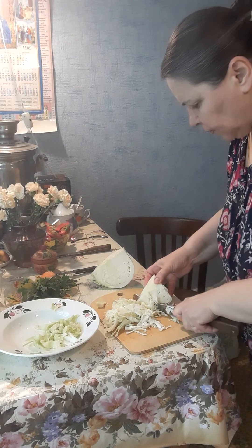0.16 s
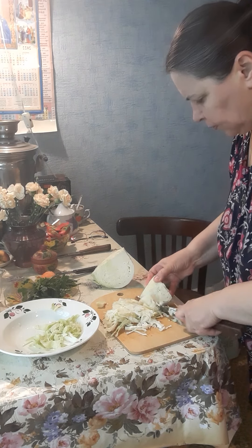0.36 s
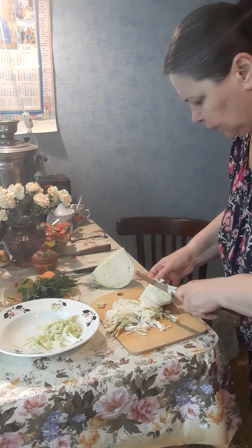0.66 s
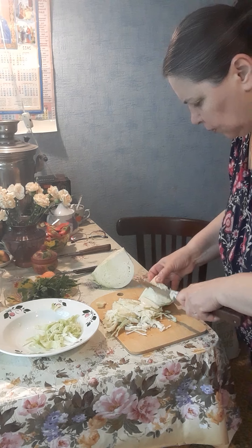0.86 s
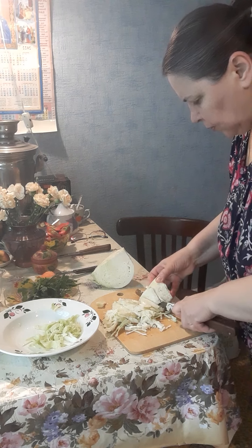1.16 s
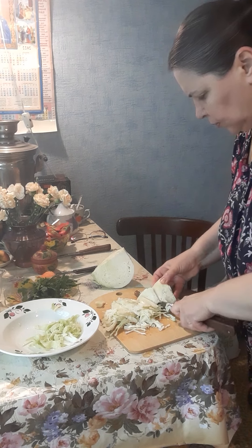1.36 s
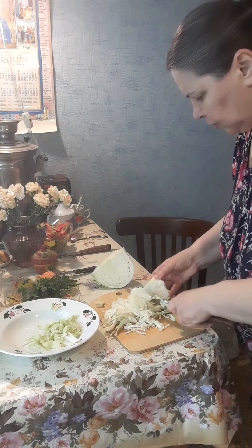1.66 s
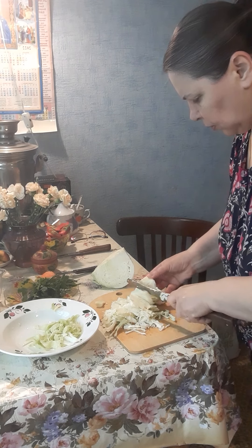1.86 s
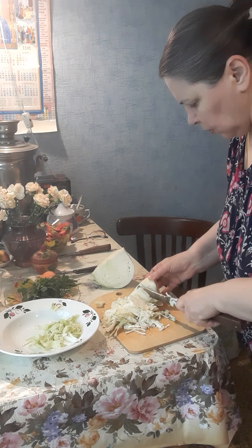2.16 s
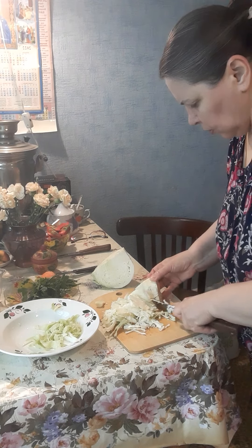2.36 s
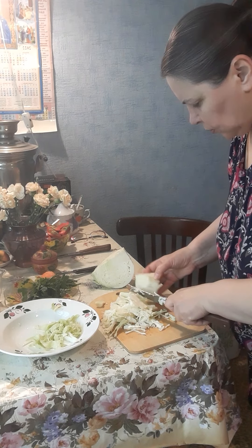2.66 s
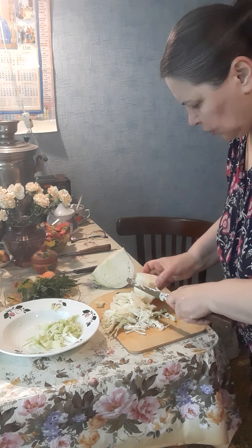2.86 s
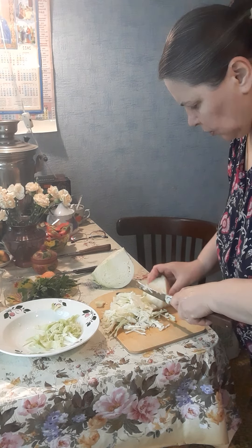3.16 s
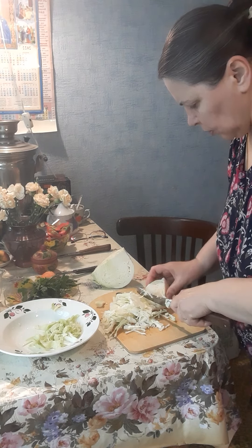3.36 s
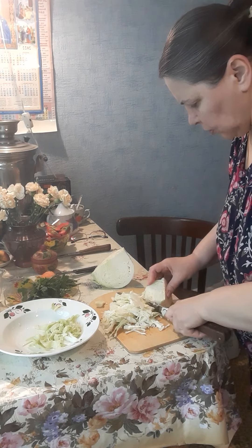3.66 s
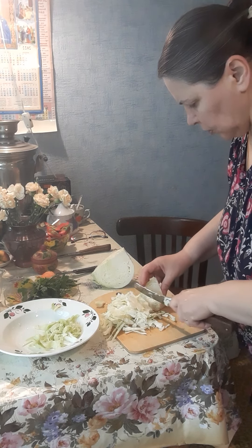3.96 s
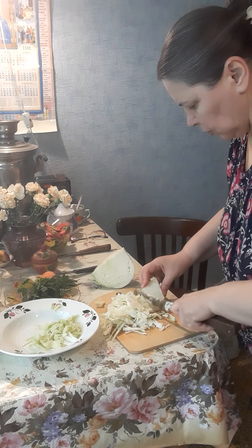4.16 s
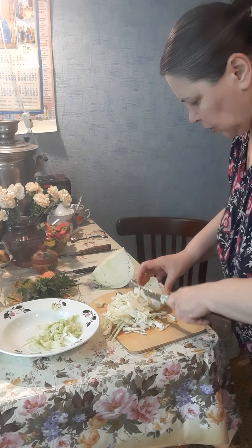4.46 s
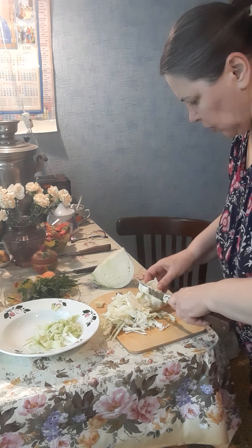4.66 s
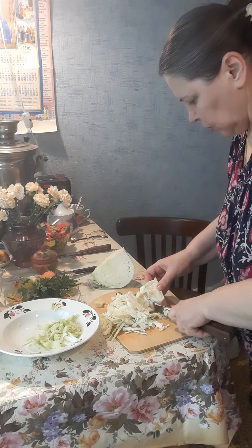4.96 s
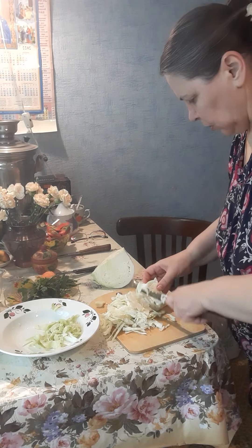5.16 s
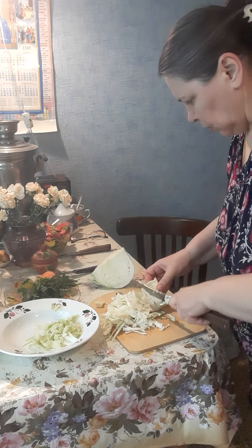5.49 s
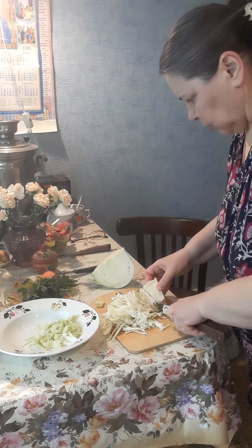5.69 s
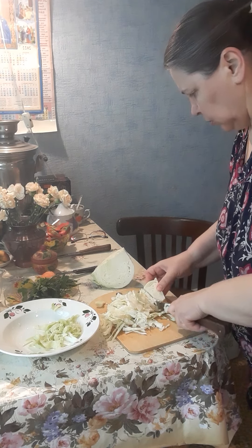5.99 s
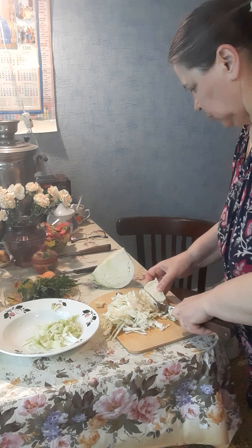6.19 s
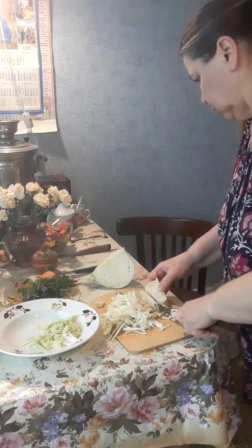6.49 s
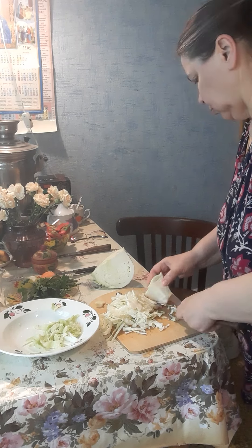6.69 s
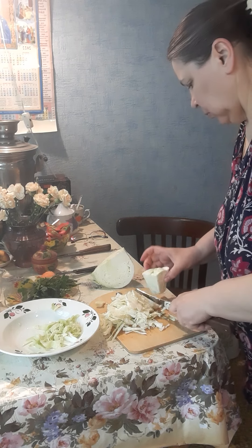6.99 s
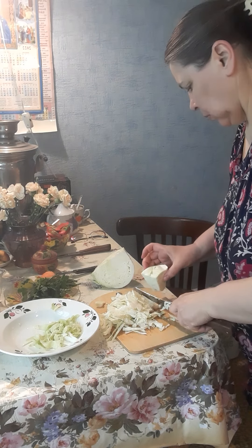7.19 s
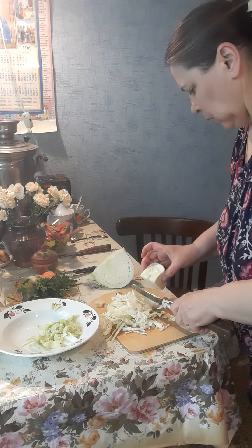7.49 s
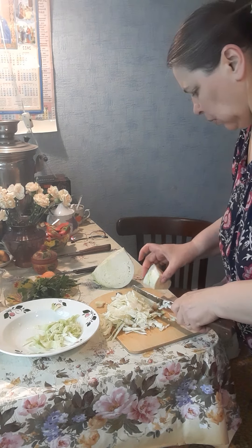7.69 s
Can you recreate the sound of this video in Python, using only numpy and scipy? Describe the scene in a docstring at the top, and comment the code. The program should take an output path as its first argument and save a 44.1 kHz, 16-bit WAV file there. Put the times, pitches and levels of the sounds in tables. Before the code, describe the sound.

Crisp, fibrous cabbage slicing on a wooden board, irregular knocks and table thuds, light leafy rustles between strokes, in a small humming kitchen.

```python
"""A kitchen knife shears through cabbage over a steady house rumble and hiss, in a small room.
Each cut snaps leaf fibres and shakes a wooden board on a cloth-covered table; blade or stalk landing
rings the board, thuds the table and cracks at the edge. Shreds crackle between the strokes.
From the third cut fingers rustle the leaves too; after the last cut shreds and fingers are left.
Of two microphone ports the left one is open; the right one is covered, dull and boomy."""
import sys
import numpy as np
from scipy import signal
from scipy.fft import rfft, irfft, next_fast_len
from scipy.io import wavfile
from scipy.ndimage import uniform_filter1d

SR = 44100
rng = np.random.default_rng(int(sys.argv[2]) if len(sys.argv) > 2 else 0)


def file_out(sig):
    """Save sig as 16-bit WAV at sys.argv[1]."""
    # one column per channel
    cols = np.atleast_2d(sig).T
    # limit, then scale
    lim = np.clip(cols, -1, 1)
    pcm = np.round(lim * 32767).astype(np.int16)
    wavfile.write(sys.argv[1], SR, pcm)


N = 345744

# Blade shearing through the head, one list a cut.
# Each row: time in seconds, snapping fibres in dB, table shaken by the arm in dB.
CUT_CURVES = [
    [(0.0, -49.5, -33.5), (0.114, -48, -38), (0.148, -36, -57)],
    [(0.835, -73.5, -61.5), (0.92, -57.5, -54), (0.989, -49, -45), (1.045, -48, -55), (1.113, -41.5, -37),
     (1.147, -45, -51.5), (1.209, -54, -55)],
    [(2.095, -81.5, -70.5), (2.14, -78, -66), (2.16, -64.5, -63), (2.194, -61, -62), (2.234, -64.5, -53),
     (2.35, -51.5, -50), (2.4, -47.5, -55), (2.45, -57.5, -65), (2.58, -63.5, -70), (2.65, -87.5, -81)],
    [(3.5, -74, -46), (3.568, -57.5, -73.5), (3.625, -44.5, -36)],
    [(4.086, -69.5, -54), (4.134, -63, -49.5), (4.176, -52, -50.5), (4.232, -45.5, -68)],
    [(4.745, -60, -54), (4.798, -51.5, -28), (4.83, -53.5, -74), (4.904, -44, -68), (4.932, -44.5, -31)],
    [(5.478, -62, -54), (5.53, -54.5, -48), (5.579, -47.5, -40.5), (5.635, -45.5, -49), (5.731, -66, -68)],
]
# Leaf met by each cut. Each row: brightness at MID_DB in dB per octave, board shaken over the snapping in dB.
CUT_LEAF = [(5.5, 5.5), (6, 5), (6, 5), (5, 7.5), (7, 6.5), (7, 9.5), (6, 8.5)]
# Settling shreds and loose leaves. Each row: start, peak and end in seconds, peak in dB, climb in dB,
# sag to the end in dB, brightness in dB per octave, peak of the board shaking in dB.
SHRED_CRACKLES = [(0.193, 0.25, .35, -67.5, 1, 8.5, 5.5, -49), (.362, 0.372, .4, -55, 9, 10, 9.5, -58.5),
                  (0.478, 0.493, 0.56, -58.5, 6, 17, 4.5, -68), (0.719, 0.732, .79, -80, 1, 14, 10, -64),
                  (1.25, 1.305, 1.46, -56, -8, 15.5, 4, -47.5),
                  (1.47, 1.526, 1.62, -66.5, 10, 14, 6.5, -62.5),
                  (1.634, 1.649, 1.68, -74.5, 5.5, 6, 9.5, -68), (2.78, 2.83, 2.88, -79, 7.5, 7, 11.5, -75),
                  (3.2, 3.222, 3.3, -72.5, 14, 2, 9.5, -52), (3.377, 3.463, 3.5, -82, 6.5, -5.5, 8.5, -72),
                  (3.654, 3.707, 3.83, -69.5, 2, 9.5, 8, -62), (4.26, 4.343, 4.46, -71, -4, 5, 7.5, -47),
                  (4.63, 4.66, 4.74, -82, 7, 3, 1.5, -68), (4.96, 5.016, 5.12, -67.5, 15, 22, 9.5, -47.5),
                  (5.35, 5.37, 5.42, -85, 7, 10, 3, -67), (5.426, 5.45, 5.48, -81.5, 7, -1, 6, -59.5),
                  (5.758, 5.87, 5.92, -78.5, 6.5, 9, 9.5, -69.5),
                  (5.974, 6.026, 6.11, -63, 14, 9, 10, -63.5), (6.19, 6.23, 6.255, -83, 3, 1, 10.5, -70),
                  (6.253, 6.301, 6.35, -60.5, 12, 12.5, 10, -63),
                  (6.512, 6.563, 6.62, -54, 10, 11, 9.5, -56.5),
                  (6.618, 6.676, 6.735, -68.5, 4.5, 9, 8, -69.5)]
# Damped wood on cloth. Each row: mode in Hz, level in dB, t60 in seconds (ring() caps it at 32 periods).
BOARD_MODES = [(208, -9, 0.16), (227, -5.5, 0.1), (287, -8, 0.033), (343.2, 4, 0.081), (381, 4.5, 0.056),
               (383.3, -2.5, 0.12), (426.9, 3.5, .04), (555.4, 1, 0.03), (626, -2, 0.023),
               (720, -0.5, 0.11), (753.4, 3, 0.038), (833, 0.5, 0.03), (930, 0, 0.015), (1100, -4, 0.015),
               (1138, -8.5, 0.18), (1380, -4.5, .02), (1486, -1.5, 0.12), (1780, -5, .02), (2060, -9, 0.12),
               (2300, -17.5, .015), (2916, -18, 0.016)]
# Table under the cloth. Each row: mode in Hz, level in dB, t60 in seconds (same cap).
TABLE_MODES = [(62, -6, .12), (78.5, 1.5, 0.1), (114.4, 0.9, 0.66)]
BOARD_BAND_HZ, TABLE_BAND_HZ = (258, 6000), (70, 150)  # what each plate radiates well
MID_DB = -46.5  # middle snapping level


def gain_of(db):
    """Decibels to an amplitude factor."""
    return 10 ** (np.asarray(db) / 20)


def evened(x):
    """Scales to rms 1."""
    return x / np.sqrt(np.mean(x ** 2) + 1e-20)


def read(points, hz):
    """Interpolates a (Hz, value) table on a log frequency axis."""
    point_hz, value = np.transpose(points)
    return np.interp(np.log(hz + 1), np.log(point_hz + 1), value)


def sides(tilt_db):
    """Left and right gains for a level difference; the mean of unrelated sides keeps power 1."""
    ratio = gain_of(-tilt_db)
    left = 2 / np.sqrt(1 + ratio ** 2)
    return left, ratio * left


def smooth_patches(x, widths):
    """Noise smoothed along both axes into patches of rms 1."""
    return evened(uniform_filter1d(uniform_filter1d(x, widths[0], axis=0), widths[1], axis=1))


def hum():
    """House rumble and hiss: random short-time spectra with a few room resonances and drifting patches."""
    # Each row: frequency in Hz, relative level in dB per Hz.
    hum_colour = [(18, -64.5), (30, -31.5), (86, -13), (112, -8), (165, -24.5), (189, -5), (266, -12),
                  (355, 6), (449, -18), (499, -17), (600, -29), (684, -24.5), (1540, -28.5), (2060, -41),
                  (16000, -42.5)]
    # Each row: centre in Hz, width in Hz, boost in dB.
    hum_peaks = [(123, 62, 6.5), (194, 130, 10), (352, 70, 2.5), (1530, 100, 11)]
    # Each row: frequency in Hz, left minus right in dB.
    hum_tilt = [(60, -5.5), (120, -16.5), (240, -18), (480, -24), (950, 0.5), (1890, 1), (3770, -3.5),
                (7520, -0.5), (15000, 3)]
    # Each row: frequency in Hz, likeness of the ports.
    hum_alike = [(60, 0.25), (180, 0.63), (550, 0.59), (1650, 0.57), (4970, 0.08), (15000, 0.03)]
    level_db = -59  # of the mean of both ports
    frames, hz = N // 512 + 5, np.fft.rfftfreq(2048, 1 / SR)
    a, b, c, d, raw_patches = rng.standard_normal((frames, 1025, 5)).T
    patches = smooth_patches(raw_patches, widths=(8, 8))
    colour_db = read(hum_colour, hz)
    for centre_hz, width_hz, db in hum_peaks:
        colour_db = colour_db + db * np.exp(-2 * ((hz - centre_hz) / width_hz) ** 2)
    alike = np.clip(read(hum_alike, hz), -1, 1)[:, None]
    first, other = a + 1j * b, c + 1j * d
    z = np.array([first, alike * first + np.sqrt(1 - alike ** 2) * other])
    z *= np.array(sides(read(hum_tilt, hz)))[:, :, None]
    z *= gain_of(colour_db[:, None] + 1.6 * patches)
    out = signal.istft(z, nperseg=2048, noverlap=1536)[1][:, :N]
    return gain_of(level_db) * out / np.std(out.mean(0))


def cut(rows, column):
    """One column of a cut in dB at every sample; it drops fast when the blade lets go."""
    lift_db_per_s = 1502
    rows, t = np.array(rows), np.arange(N) / SR
    db = np.interp(t, rows[:, 0], rows[:, column], left=-200)
    return db - lift_db_per_s * np.maximum(t - rows[-1, 0], 0)


def swell(start, peak, end, db, climb_db, sag_db):
    """Level in dB at every sample: a sudden start, a climb to the peak, a sag, a quick stop."""
    stop_db_per_s = 504
    t = np.arange(N) / SR
    level_db = np.interp(t, np.sort([start, peak, end]), [db - climb_db, db, db - sag_db], left=-200)
    return level_db - stop_db_per_s * np.maximum(t - end, 0)


def grains(per_s, spread_db):
    """Random clicks of either sign, a few of them large, at rms 1."""
    size = gain_of(spread_db * np.minimum(rng.exponential(1, N), 4))
    return evened(size * rng.standard_normal(N) * (rng.random(N) < per_s / SR))


def leaves():
    """Dense fibre snaps in clumps, coloured by the leaf and tilted by brightness; shreds settle between cuts."""
    # Tearing leaf. Each row: frequency in Hz, relative level in dB per Hz.
    snap_colour = [(290, -44.5), (500, -14), (562, -7.5), (613, -2.5), (807, 1.5), (974, -4.5), (1380, 5.5),
                   (1530, 6.5), (2460, -2), (7860, -21.5), (9770, -30.5), (13800, -28), (16000, -36)]
    bright_per_db = -0.12  # dB per octave for each dB: light pressure sounds thin, full pressure dull
    cuts_db = [cut(rows, column=1) for rows in CUT_CURVES]
    crackles_db = [swell(*row[:6]) for row in SHRED_CRACKLES]
    power = gain_of(cuts_db + crackles_db) ** 2 + 1e-30
    brights = [leaf[0] + bright_per_db * (db - MID_DB) for db, leaf in zip(cuts_db, CUT_LEAF)]
    brights += [row[6] + np.zeros(N) for row in SHRED_CRACKLES]
    bright = (power * np.clip(brights, -9, 12)).sum(0) / power.sum(0)  # the loudest part decides

    clumps = gain_of(2.0 * evened(uniform_filter1d(rng.standard_normal(N), size=300)))
    snaps = evened(clumps * grains(per_s=12000.0, spread_db=1.0))
    hz, t, z = signal.stft(snaps, SR, nperseg=256, noverlap=192)
    colour = gain_of(read(snap_colour, hz))
    colour = colour / np.sqrt(np.mean(colour[hz > 2500] ** 2))
    slope = np.interp(t, np.arange(N) / SR, bright)
    octaves = np.log2((hz[:, None] + 200) / 5000)
    patches = smooth_patches(rng.standard_normal(z.T.shape), widths=(24, 5)).T
    z = z * gain_of(1.9 * patches) * colour[:, None] * gain_of(octaves * slope)
    level = uniform_filter1d(np.sqrt(power.sum(0)), size=100)
    return level * signal.istft(z, SR, nperseg=256, noverlap=192)[1][:N]


def ring(modes, band_hz, place_db=0., size=16384):
    """Answer of a plate to a click, energy 1: decaying modes, their levels shifted by the place of the blow."""
    t = np.arange(size) / SR
    hz, db, t60 = np.transpose(modes)[:, :, None]
    db = db + place_db * rng.standard_normal(db.shape)
    decay = gain_of(db - 60 * t / np.minimum(t60, 32 / hz))
    out = (decay * np.sin(2 * np.pi * hz * t)).sum(0)
    out = signal.sosfilt(signal.butter(4, band_hz, "band", fs=SR, output="sos"), out)
    return out / np.linalg.norm(out)


def push():
    """The jerky force of the blade excites the low board modes and the table."""
    board_grows = 1.3  # dB of board shaking per dB of snapping
    jerks = grains(per_s=1500., spread_db=1.2)
    on_board, on_table = np.zeros(N), np.zeros(N)
    for rows, leaf in zip(CUT_CURVES, CUT_LEAF):
        over_mid_db = cut(rows, column=1) - MID_DB
        on_board += gain_of(MID_DB + leaf[1] + board_grows * over_mid_db)
        on_table += gain_of(cut(rows, column=2))
    for row in SHRED_CRACKLES:
        on_board += gain_of(swell(*row[:3], row[7], *row[4:6]))
    board_force = uniform_filter1d(on_board, size=500) * jerks
    table_force = uniform_filter1d(on_table, size=500) * jerks
    board = signal.oaconvolve(board_force, ring(BOARD_MODES[:7], BOARD_BAND_HZ))
    table = signal.oaconvolve(table_force, ring(TABLE_MODES, TABLE_BAND_HZ))
    return (board + table)[:N]


def chops():
    """A smooth blow rings the chattering board, brighter for a short contact; table thuds, edge cracks."""
    # Blade or stalk lands. Each row: time in seconds, energy into the board in dB,
    # contact time constant in ms (floor 0.02), energy into the table in dB, crack before its fades in dB.
    landings = [(.152, 10, 0.039, -12.5, -30.5), (1.228, 16.5, .035, -2.5, -21),
                (2.404, -0.15, 0.078, -21.5, -37.5), (2.998, -11.5, 0.54, -32, -76.5),
                (3.213, 9, 0.55, -6.5, -64), (3.631, 6, 0.08, -29, -33.5), (4.238, 10, 0.053, -6, -34.5),
                (4.937, 6, 0.081, -21, -39)]
    # Each row: frequency in Hz, relative level in dB.
    crack_colour = [(600, -15), (1500, 0.5), (2500, 5), (4000, -7), (8000, -12), (10000, -23),
                    (13000, -19.5), (16000, -23.5)]
    # chatter on the cloth: level under the blow, hold, fall
    rattle_db, rattle_s, rattle_db_per_s = -36, 0.024, 246.5
    out, table = np.zeros(N + SR), ring(TABLE_MODES, TABLE_BAND_HZ)
    t = np.arange(8192) / SR
    colour = gain_of(read(crack_colour, np.fft.rfftfreq(len(t), 1 / SR)))
    crack_fade = np.exp(-t / 0.008) * (1 - np.exp(-t / 0.003))
    rattle = gain_of(rattle_db - rattle_db_per_s * np.maximum(t - rattle_s, 0))
    jerks = grains(per_s=1500., spread_db=1.2)
    for start_s, blow_db, contact_ms, thud_db, crack_db in landings:
        at = round(start_s * SR)
        blow = t ** 3 * np.exp(-t * 1000 / max(contact_ms, .02))
        force = jerks[at:at + len(t)] * rattle
        force[0] = 1  # the blow itself
        plates = signal.fftconvolve(force, ring(BOARD_MODES, BOARD_BAND_HZ, place_db=2.5))
        plates[:len(table)] += gain_of(thud_db - blow_db) * table
        sound = signal.fftconvolve(blow / blow.sum(), gain_of(blow_db) * plates)
        crack = evened(irfft(colour * rfft(rng.standard_normal(len(t)))))
        sound[:len(t)] += gain_of(crack_db) * crack * crack_fade
        out[at:at + len(sound)] += sound
    return out[:N]


def fingers():
    """A thin, high rustle of skin on waxy leaf: dense band-passed clicks under slow swells."""
    # Each row: start, peak and end in seconds, peak in dB, climb in dB, sag to the end in dB.
    rubs = [(2.73, 2.813, 2.87, -79, 6.5, 5), (3.0, 3.092, 3.14, -82, 10, 3.5),
            (3.184, 3.221, 3.27, -72, 10.5, 12.5), (3.37, 3.4, 3.8, -84.5, 7.5, 5),
            (3.97, 4.05, 4.07, -80, 6, 1), (4.092, 4.1, 4.15, -79, 3.5, 5), (4.3, 4.39, 4.4, -79, 10, -2),
            (4.51, 4.54, 4.7, -88, 1, 5), (4.636, 4.69, 4.73, -85, 6, 11), (5.81, 5.856, 5.9, -76.5, 8, 9),
            (5.971, 6.018, 6.18, -67.5, 4, 25), (6.25, 6.292, 6.4, -71.5, 4, 20)]
    rustle_hz = (5640, 8330)
    band = signal.butter(3, rustle_hz, "band", fs=SR, output="sos")
    rustle = signal.sosfilt(band, grains(per_s=21000.0, spread_db=5.5))
    level = sum(gain_of(swell(*row)) for row in rubs)
    return uniform_filter1d(level, size=600) * evened(rustle)


def tails(count):
    """Unrelated room answers of energy 1: dense echoes that die band by band."""
    # Each row: frequency in Hz, t60 in seconds.
    room_t60 = [(60, 0.13), (250, 0.23), (1000, 0.29), (3000, 0.2), (8000, 0.19), (16000, 0.2)]
    # First reflections keep their level. Each row: frequency in Hz, hold in seconds.
    dense_hold = [(300, 0.033), (1500, 0.0087), (4000, 0.025)]
    echoes = rng.standard_normal((count, SR // 2)) * (np.arange(SR // 2) > 60)
    hz, t, z = signal.stft(echoes, SR, nperseg=256)
    late_s = np.maximum(t - read(dense_hold, hz)[:, None], 0)
    decay = gain_of(-60 * late_s / read(room_t60, hz)[:, None])
    tail = signal.istft(z * decay, SR, nperseg=256)[1]
    return tail / np.linalg.norm(tail, axis=1, keepdims=True)


def ports(x):
    """The covered port hears a late, dull copy of the open one plus its own share of the room."""
    # Each row: frequency in Hz, left minus right in dB.
    port_tilt = [(60, -18.5), (99, -6.5), (160, -4.5), (270, -11), (450, -8.0), (740, -1), (1220, 6),
                 (2010, -1.5), (3330, 13.5), (5500, 15.5), (9080, 28.5), (15000, 25)]
    # Each row: frequency in Hz, likeness of the ports from 0 to 1.
    port_alike = [(60, 0.96), (250, 1), (500, 0.69), (1500, 0.39), (5000, 0.1), (15000, .2)]
    # Each row: frequency in Hz, phase by which left leads in radians.
    port_lead = [(60, 0.13), (300, 0.63), (700, 2.21), (1200, 3), (1800, 5.8), (3500, 25), (16000, 5.3)]
    wet = gain_of(-1)  # room over direct sound
    size = next_fast_len(N + SR)
    hz = np.fft.rfftfreq(size, 1 / SR)
    # the blade moves, so the sound wanders among three paths through the room, 2.3 rounds per s
    turn = np.pi * (2.3 * np.arange(N) / SR + np.arange(3)[:, None] / 3)
    paths = rfft(x * np.cos(turn) ** 2 * np.sqrt(8 / 9), size)  # powers sum to 1
    rooms = rfft(tails(count=6), size)
    near = (rfft(x, size) + wet * (paths * rooms[:3]).sum(0)) / np.sqrt(1 + wet ** 2)
    other = (paths * rooms[3:]).sum(0)
    alike = np.clip(read(port_alike, hz), 0, 1)
    left, right = sides(read(port_tilt, hz))
    covered = (alike * near + np.sqrt(1 - alike ** 2) * other) * np.exp(-1j * read(port_lead, hz))
    return irfft(np.array([left * near, right * covered]), size)[:, :N]


def scene():
    """Knife, leaves, fingers and board through room and ports, over the hum."""
    return ports(leaves() + fingers() + push() + chops()) + hum()


def record(dry):
    """Small microphones lose the deep bass; then the band limit."""
    low_hz, edge_hz = 65, 15800
    thin = signal.sosfilt(signal.butter(2, low_hz, "high", fs=SR, output="sos"), dry)
    band_limit = signal.firwin(511, edge_hz, window=("kaiser", 9), fs=SR)
    return signal.oaconvolve(thin, band_limit[None], "same")


dry = scene()
out = record(dry)
file_out(out)
```